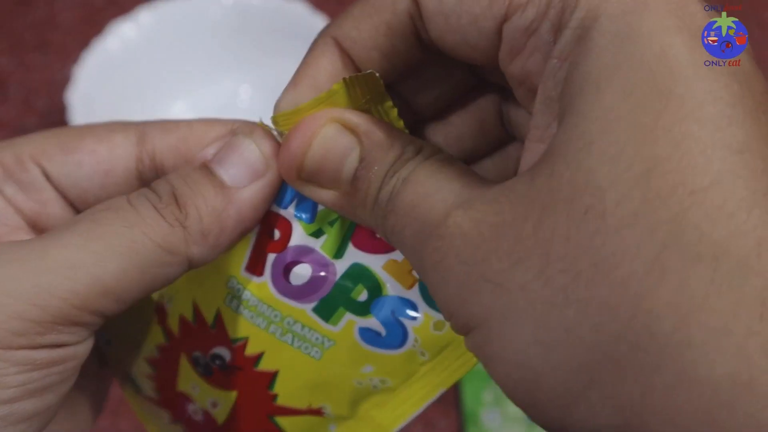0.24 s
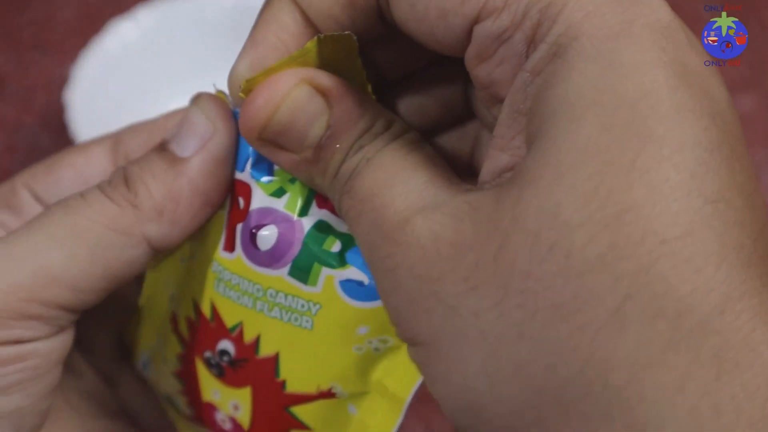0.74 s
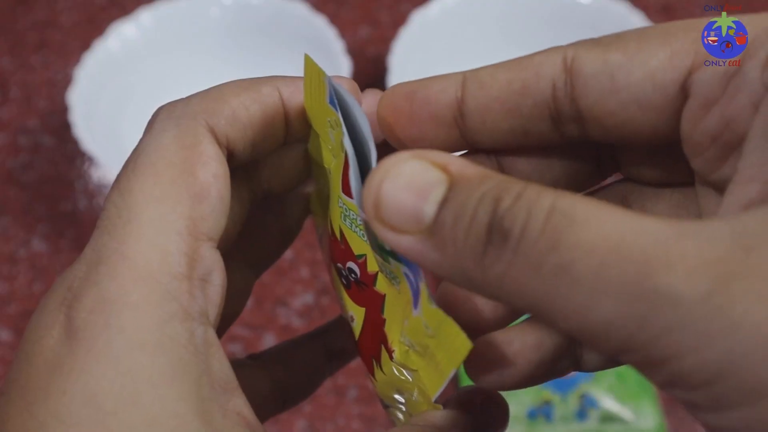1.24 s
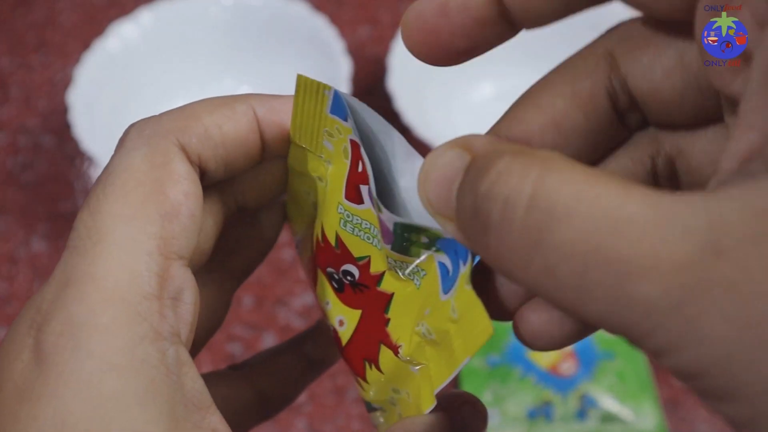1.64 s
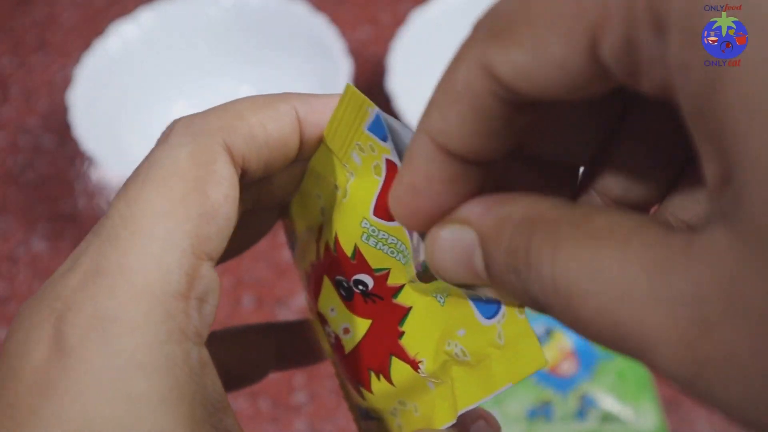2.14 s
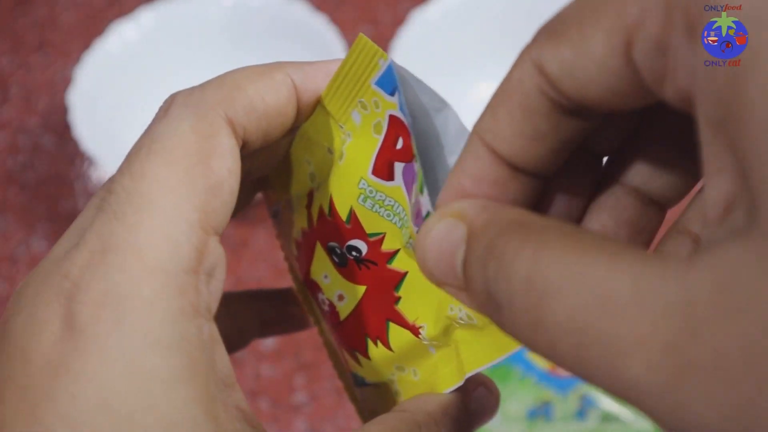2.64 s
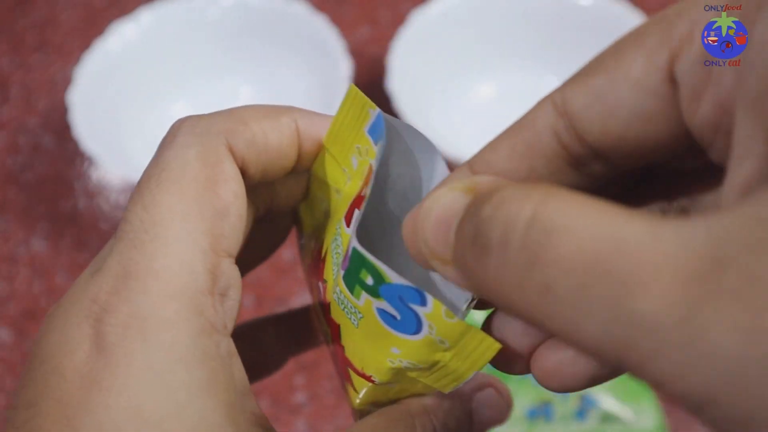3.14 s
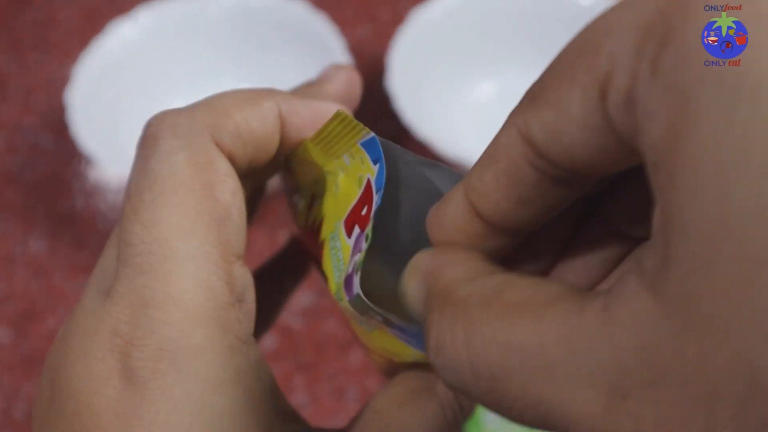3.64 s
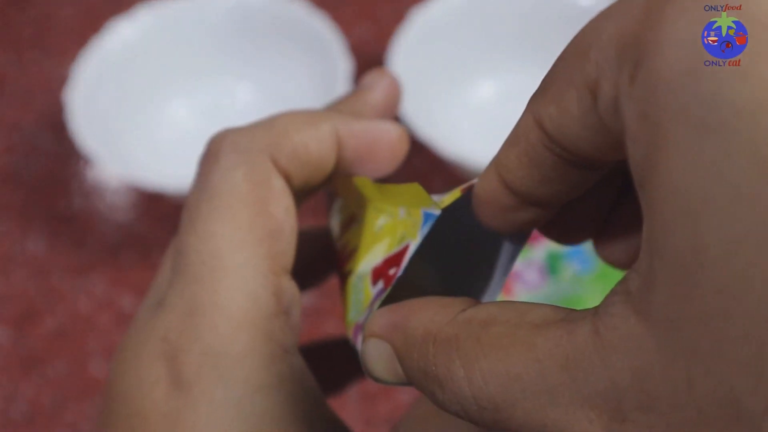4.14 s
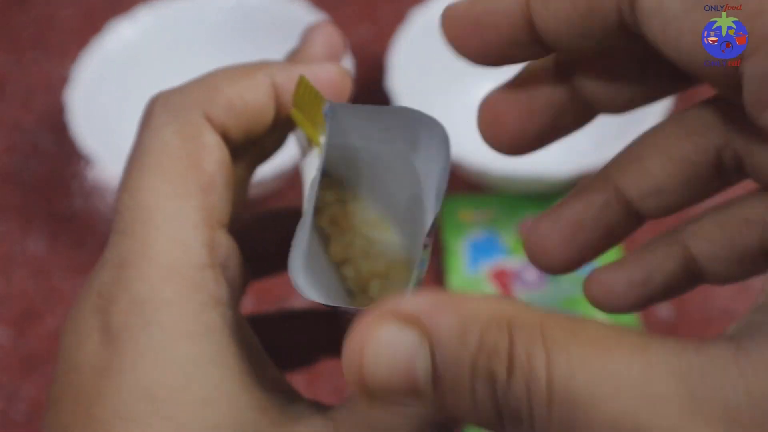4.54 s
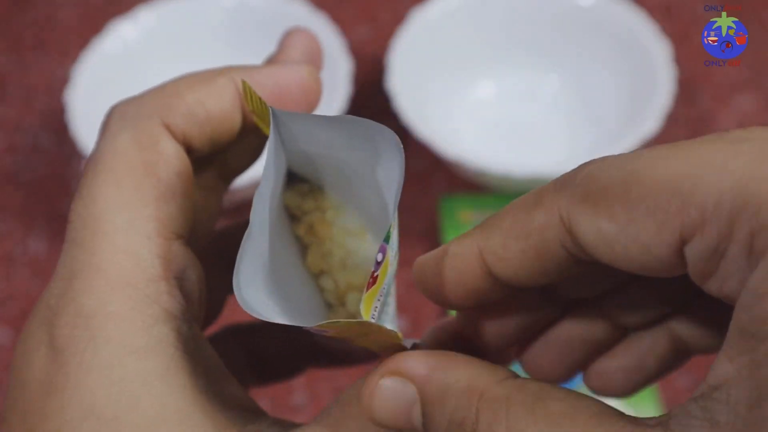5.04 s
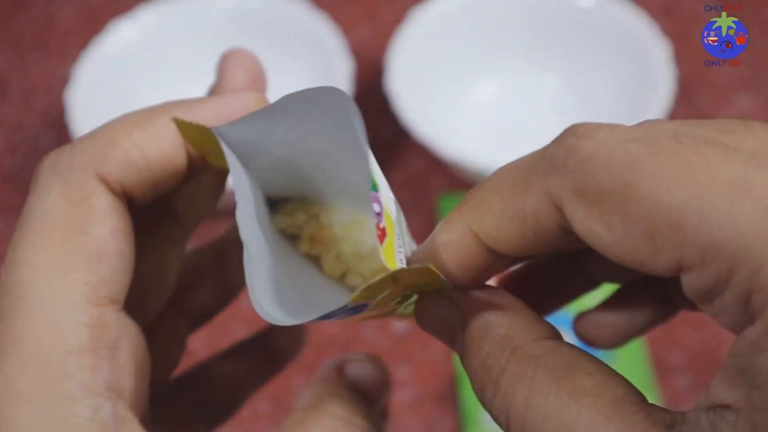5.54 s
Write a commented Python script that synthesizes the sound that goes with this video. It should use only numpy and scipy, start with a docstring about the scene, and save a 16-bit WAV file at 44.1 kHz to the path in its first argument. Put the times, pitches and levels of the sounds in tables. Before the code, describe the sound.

Thin, stiff plastic film crackles right beside the microphone, slightly left of centre. The seal tears abruptly at the start, then fingers make isolated clicks and short sliding rustles. Around three seconds the crackling turns loud and dense with a low thud, more snaps follow, and the last second and a half is nearly quiet with a few small crinkles. Short room echo, low background rumble, no speech.

```python
"""A hard-walled room: two hands tear and spread a small foil-lined sweet packet close to a stereo microphone.
Creases, the torn seal and sliding fingers are shaped runs of random cracks, coloured by sheet and pouch.
Rustle is dense tiny clicks in clumps; the room answers briefly with noise that dies away band by band.
Underneath lies a lumpy low rumble of filtered noise, which also gives the low thuds under loud snaps;
narrow resonances give a few wavering hums and the low ring of a thud."""
import sys
import numpy as np
from scipy import signal
from scipy.fft import rfft, irfft, next_fast_len
from scipy.io import wavfile
from scipy.ndimage import uniform_filter1d

SR = 44100
rng = np.random.default_rng(int(sys.argv[2]) if len(sys.argv) > 2 else 0)


def to_wav(sig):
    """Store sig (one row per channel, or 1-D mono) as 16-bit WAV at the path in sys.argv[1].

    Samples outside -1..1 are clipped; the rate is SR.
    """
    pcm = np.clip(np.atleast_2d(sig), -1, 1) * 32767
    pcm = np.round(pcm).astype(np.int16)
    wavfile.write(sys.argv[1], SR, pcm.T)  # frames by channels


N = 255780

# creases snapping through: (time [s], level [dB], ring of the panel [Hz], ring [dB],
# dull part [dB], hollow part [dB], bright part [dB], hold [s], fall by 60 dB [s])
SNAPS = [(0.041, 3.5, 2940, 14.5, -29.5, -19, -4.5, 0.0013, 0.014),
         (0.077, -10, 2760, 5.5, -39, -27.5, -16, 0.0017, 0.054),
         (0.148, -16.5, 3000, 3.5, -33.5, -21.5, -27, 0.0036, 0.019),
         (0.185, -25.5, 2970, -1, -48, -35, 0, 0.0014, 0.016),
         (0.248, -16, 588, 6.5, -11.5, -12, -21.5, 0.0019, 0.023),
         (0.265, -20.5, 2264, 0.5, -27.5, -26, -17, 0.0019, 0.075),
         (0.448, -25.5, 2675, 7, -36, -24, -38, 0.0012, 0.014),
         (0.478, -35.5, 506, 21, -17, -8, -32.5, 0.0011, 0.03),
         (0.556, -15.5, 2010, 10, -46, -18, -22, 0.0021, 0.02),
         (0.599, -13, 2270, 14, -44, -20.5, -29.5, 0.0012, 0.0083),
         (0.709, -9.5, 2210, 10.5, -34, -20, -18, 0.0014, 0.013),
         (0.913, -34, 3560, 10, -36, -17, -9, 0.0014, 0.038),
         (0.96, -16, 1040, 11, -21, -24.5, -13.5, 0.0019, 0.05),
         (0.966, -19, 1020, 4.5, -22, -5.5, -12, 0.0018, 0.043),
         (1.111, -35, 2650, 12.5, -21, -54, -13, 0.0012, 0.038),
         (1.386, -34.5, 1950, 2.5, -24.5, -20, -22, 0.0012, 0.047),
         (1.718, -24, 2750, 6, -20, -18.5, -23, 0.0012, 0.036),
         (1.781, -36, 715, 13.5, -18.5, -18, -14, 0.0012, 0.039),
         (1.901, -45.5, 4200, 22, -33, -35, -7.5, 0.0012, 0.075),
         (2.034, -17, 2060, 3, -26, -15, -13, 0.0013, 0.052),
         (2.207, -30, 1950, 12, -49, -49, -34, 0.0012, 0.027),
         (2.243, -40, 1890, 13, -26, -24, -20, 0.00092, 0.019),
         (2.406, -15, 1950, 2, -31.5, -16, -15.5, 0.0016, 0.025),
         (2.557, -13, 3160, 9, -30.5, -6.5, -8.5, 0.00088, 0.027),
         (2.578, -25, 2650, 16, -31, -16.5, -18, 0.0012, 0.025),
         (2.664, -31, 1830, 5, -35, -25, -14.5, 0.0026, 0.025),
         (2.734, -41, 1970, 10, -26.5, -25.5, 8.5, 0.0012, 0.025),
         (2.769, -12, 4250, 11.5, -29, -23.5, -0.5, 0.0014, 0.03),
         (2.806, 0.5, 3520, 11, -17.5, -16, -8.5, 0.0015, 0.03),
         (2.822, -10.5, 2310, 6, -40.5, -21, -22.5, 0.0014, 0.041),
         (2.845, -12.5, 1195, 10.5, -11.5, -14, -33, 0.0018, 0.0093),
         (2.849, 0, 2090, 4.5, -25.5, -23.5, -22, 0.0004, 0.046),
         (2.979, -8, 1950, 16.5, -31, -28, -9, 0.00056, 0.043),
         (3.177, -40.5, 2520, 4, -26, -16, -19.5, 0.0018, 0.026),
         (3.201, -36.5, 2444, 16, -30, -6, -52.5, 0.0026, 0.025),
         (3.337, -33, 1820, 8.5, -31, -17, -13.5, 0.002, 0.025),
         (3.425, -33.5, 1225, 12, -13, -14.5, -29, 0.00098, 0.025),
         (3.522, -0.5, 2060, 5, -29.5, -25.5, -17.5, 0.0024, 0.021),
         (3.526, -4, 2080, 0.5, -3, -12.5, -18, 0.00086, 0.0097),
         (3.591, -2, 894, 11, -19.5, -27.5, -17.5, 0.00057, 0.021),
         (3.751, -21.5, 2040, 13, -28, -9, -28, 0.0009, 0.017),
         (3.804, -15.5, 1170, 4.5, -15, -4.5, -41, 0.0019, 0.014),
         (3.867, -20, 1900, 14, -34, -17, -22, 0.0011, 0.032),
         (3.951, -40, 2450, 12, -20, -15, -6, 0.0013, 0.075),
         (4.029, -19, 3600, 3, -22, -26.5, -23, 0.00084, 0.068),
         (4.15, -16.5, 1150, 1, -33, -1.5, -24, 0.0034, 0.023),
         (4.286, -31, 4150, 7, -38, -22, -15, 0.0012, 0.029),
         (4.459, -22.5, 1266, 24.5, -19, -39, -14.5, 0.0012, 0.054),
         (4.482, -27, 2570, 5, -16.5, -30, -16, 0.0011, 0.042),
         (4.54, -30, 2430, 5, -23, -35, -11, 0.0012, 0.025),
         (4.556, -28, 3940, 7, -33, -32, -10, 0.0012, 0.021),
         (4.606, -26, 1950, 13.5, -53, -26, -12.5, 0.00083, 0.059),
         (4.688, -37, 2445, 5.5, -38, -35.5, -14, 0.0012, 0.037),
         (5.071, -26, 512, 19.5, 0, -29, -13, 0.0011, 0.033),
         (5.392, -24.5, 458, 10, -13, -18, -15.5, 0.00086, 0.073),
         (5.763, -25, 1850, 27, -38, -55, -13.5, 0.002, 0.0223)]
# the seal tearing open, a rip that stops short: columns as for the snaps
TEAR = [(0.047, -18, 3137, 3, -37, -19.5, -13, 0.06, 0.017)]
# fingers sliding over the film in short strokes: columns as for the snaps
STROKES = [(0.696, -23, 2290, 5, -24, -26, -18.5, 0.023, 0.045),
           (1.29, -42, 3900, 5, -41, -25, -17, 0.034, 0.13),
           (1.661, -43, 560, 6.2, -18, -26, -8.5, 0.029, 0.11),
           (2.334, -23.5, 900, 6.4, -14.5, -8.5, -10.5, 0.021, 0.18),
           (2.378, -24.5, 3060, 8.6, -24, -16, -12.5, 0.037, 0.065),
           (2.551, -25, 1260, 4, -36, -23, -17, 0.033, 0.12),
           (3.724, -16, 2540, 3.6, -18, -16, -16, 0.0086, 0.057),
           (4.402, -29, 2510, 9.2, -43, -21.5, -14, 0.042, 0.08),
           (4.435, -27, 1230, 10, -26, -17, -13, 0.04, 0.19),
           (4.921, -65, 459, 4.9, -2, -27, -11, 0.021, 0.072),
           (5.073, -28.5, 493, 7.6, -6, -16.5, -13, 0.023, 0.1),
           (5.327, -53.5, 463, 5, -22, -31, 9, 0.035, 0.08),
           (5.573, -29.5, 1890, 5, -24.5, -20, -7.5, 0.046, 0.16)]
# colour of a crack in the sheet: (frequency [Hz], usual level [dB],
# share of the dull part, of the hollow part, of the bright part, of the level [dB per dB])
SHEET = [(144, -32, .4, 0.0, 0.14, .2), (314, -18.5, 0.15, 0.059, 0.16, .25),
         (480, -12.5, 1.4, 0.0, 0.34, 0.23), (720, -7.5, 0.76, .15, 0.13, 0.13),
         (1026, -2.5, .1, .9, 0.15, 0.17), (1450, -3, 0.0, .8, 0.033, 0.16),
         (1950, -2.5, 0.26, 0.21, 0.22, 0.064), (2940, -.5, 0.0, 0.0077, 0.22, 0.21),
         (5070, 0.5, 0.0, 0.18, 0.82, 0.16), (7210, -7, 0.18, 0.17, 1.3, 0.0),
         (10530, -7, 0.1, 0.0, 2.1, 0.0), (15230, -37, 0.99, 0.17, 1.5, .45),
         (17060, -44, 0.081, 0.0, 0.65, .45)]
# usual dull part, hollow part, bright part and level of a crack: [dB] each
USUAL_PARTS = [-27, -19, -16, -20]
# resonances of the pouch, the bowls nearby and the microphone: (frequency [Hz], width [Hz], lift [dB])
POUCH = [(303, 25, 9.5), (449, 12, 7), (468, 55, 1.5), (856, 280, 5.5), (1140, 62, 2.5), (1772, 24, 8.5),
         (1929, 22, 10.5), (2122, 130, 6.5), (2404, 120, 5), (2600, 78, 5), (3130, 56, -1.5),
         (3650, 67, 3.5), (4220, 190, 4), (7670, 790, 2.5), (9460, 2100, 0.5)]
# fingers on the film: (time [s], dull rub [dB], body rustle [dB], bright fizz [dB])
RUSTLE = [(0.0, -44.5, -30.5, -30), (0.1, -74, -53.5, -54.5), (0.34, -59.5, -59.5, -62.5),
          (0.6, -58.5, -58, -62), (0.74, -53.5, -50, -54), (0.92, -75, -55, -50.5),
          (1.11, -68, -64.5, -70.5), (1.29, -79.5, -69, -78), (1.48, -73, -83, -112),
          (1.71, -101, -84, -63), (1.84, -74.5, -73, -62.5), (2.36, -69, -59.5, -63),
          (2.5, -72, -50.5, -51.5), (2.71, -66, -56.5, -55.5), (2.94, -61, -43.5, -39.5),
          (3.29, -74.5, -58, -62), (3.46, -65, -71, -72), (3.57, -62.5, -37, -64), (3.68, -54, -42, -60),
          (3.73, -57, -47, -47), (4.26, -66, -58.5, -64.5), (4.46, -69, -59.5, -59), (4.59, -69, -53, -52),
          (4.75, -72.5, -69.5, -68), (4.86, -82.5, -98, -95.5), (5.07, -90, -83, -78),
          (5.25, -87.5, -90, -89), (5.43, -71, -74.5, -54), (5.57, -80, -71, -73), (5.8, -75, -63, -57)]
# bands of the rub, the rustle and the fizz: (low edge [Hz], high edge [Hz])
RUSTLE_BANDS = [(400, 1400), (1400, 5000), (5000, 14000)]
# decay of the room: (frequency [Hz], fall by 60 dB [s])
ROOM_DECAY = [(300, 0.36), (1000, 0.35), (3000, 0.31), (8000, 0.29), (14000, 0.24)]
# level of the deep rumble: (time [s], level [dB])
DEEP_LEVEL = [(0.0, -52), (0.05, -70.5), (0.13, -57), (0.6, -60), (0.68, -43), (0.76, -58.5), (0.93, -53),
              (1.06, -67), (1.24, -54), (1.28, -64.5), (1.45, -51.5), (2.0, -52), (2.16, -67), (2.23, -43),
              (2.49, -59), (2.63, -53.5), (2.7, -70), (2.86, -56), (2.92, -72.5), (3.0, -56), (3.09, -78),
              (3.28, -50), (3.44, -78.5), (3.47, -48), (3.65, -60.5), (3.94, -41), (4.04, -60),
              (4.15, -44.5), (4.41, -51), (4.49, -63), (4.68, -45), (4.75, -63), (5.09, -55), (5.1, -50),
              (5.74, -63.5), (5.8, -74.5)]
# humps in the deep rumble: (frequency [Hz], width [Hz], lift [dB])
DEEP_HUMPS = [(88.1, 13, 8), (117.6, 2.4, 8.5)]
# level of the upper rumble and of the low thuds under loud snaps: (time [s], level [dB])
UPPER_LEVEL = [(0.0, -62), (0.06, -48), (0.13, -68.5), (0.53, -56.5), (1.05, -55.5), (1.28, -81.5),
               (1.97, -70), (2.03, -54.5), (2.18, -76), (2.44, -59.5), (2.68, -83.5), (2.86, -37.5),
               (2.99, -66), (3.49, -69), (3.52, -51), (4.04, -62.5), (4.07, -62), (5.02, -80), (5.07, -72),
               (5.8, -59)]
# wavering hums, and at 327 Hz the low ring of a thud: (time [s], length [s], frequency [Hz], level [dB])
LOW_TONES = [(0.123, 0.33, 170, -55), (0.423, 0.2, 290, -61), (0.624, 0.27, 170, -62),
             (1.978, 0.13, 170, -54.5), (2.216, .36, 170, -54.5), (2.6, 0.4, 447, -71),
             (2.803, 0.11, 170, -54), (2.825, 0.13, 447, -55), (2.833, 0.126, 327, -50),
             (3.107, 0.24, 170, -55.5), (3.7, 0.2, 290, -46), (3.933, 0.115, 290, -42.5),
             (3.937, 0.079, 447, -68.5), (4.219, 0.29, 170, -57.5), (5.131, .06, 170, -54),
             (5.553, 0.33, 290, -67)]
# width of the stereo picture, as gain of the side signal: (frequency [Hz],
# near cracks [dB], their echoes [dB], soft sounds [dB])
WIDTH = [(60, -17, -9, -21), (147.2, -8, -3.5, -10), (400, -11.5, -9.5, -2), (1000, -11.5, -1, 3.5),
         (2000, -8.5, 0.5, -1), (3200, -9, 2, -2.5), (5900, -6, -3.5, -3.5), (6700, -6.5, -7, -14.5),
         (9050, -12.5, -7, -15), (14000, -5.5, -11.5, -13)]

SNAP_GAIN_DB, STROKE_GAIN_DB, ROOM_GAIN_DB = -10, -16, -6.5
SNAP_RISE_S, STROKE_RISE_S = 0.001, 0.0024
NEARNESS = 0.16   # share of a crack's level that comes from being near the microphone, so is not in its echo
CRINKLES_PER_S, CRINKLE_S, CRINKLE_LIFT = 40, 0.012, 0.8
TONE_HZ, TONE_WIDTH_HZ, TONE_EDGE_S = [170, 290, 327, 447], 12, 0.06
LOWEST_DB, LOWEST_FOLLOWS = -66.5, 0.4   # lowest rumble: level, and share of the deep rumble's swing
LEFT_LEAD_S, LEAD_TOP_HZ = 0.00006, 6160   # the packet is nearer the left; the lead fades above this pitch
SOFT_TOP_HZ, CUTOFF_HZ = 11500, 16200


def snaps():
    """Snap-through buckling: a crease flips abruptly, with one large crack standing out of a dense run."""
    return bursts(SNAPS, SNAP_RISE_S, per_s=10000, spread_db=3.5, gain_db=SNAP_GAIN_DB, first=4.4)


def tear_and_strokes():
    """Tearing and sliding friction: many small releases follow so densely that no single crack stands out."""
    return bursts(TEAR + STROKES, STROKE_RISE_S, per_s=17000, spread_db=1.5, gain_db=STROKE_GAIN_DB, first=0)


def bursts(table, rise, per_s, spread_db, gain_db, first):
    """Source and filter: runs of cracks swell, die and excite the sheet; gives middle, side and room feed."""
    start, level_db, ring_hz, ring_db, *parts_db, hold, fall = np.array(table).T[..., None]
    t = np.arange(8192) / SR
    swell = np.minimum((t + 1e-4) / rise, 1) ** 2.2
    decay = from_db(-60 * np.maximum(t - rise - hold, 0) / np.maximum(fall, 1e-3))
    shape = swell * decay

    cracks = clicks((len(table), 2, len(t)), per_s, spread_db)
    cracks[..., int(rise * SR)] += first      # the crack that lets the crease go
    cracks = rfft(cracks * shape[:, None])
    even = -0.5 * np.log(uniform_filter1d(np.abs(cracks) ** 2, size=61))      # no broad chance colour of its own

    hz = np.arange(len(t) // 2 + 1) * SR / len(t)
    colour_db = sheet_colour(hz, [*parts_db, level_db])
    # the panel beside the crease rings at its own pitch
    colour_db += ring_db / (1 + ((hz / ring_hz - 1) / 0.081) ** 2)
    response = causal(even + np.log(from_db(colour_db))[:, None])
    sounds = lift(irfft(cracks * response), POUCH)

    strength = np.sqrt(np.sum(sounds ** 2, axis=2) / np.sum(shape ** 2, axis=1)[:, None])
    sounds = sounds * (from_db(level_db + gain_db) / strength)[..., None]
    far_gain = from_db(-NEARNESS * (level_db - USUAL_PARTS[-1]))
    far = sounds[:, :1] * far_gain[..., None]

    out = np.zeros((3, N + len(t)))
    for s, sound in zip(start[:, 0], np.concatenate([sounds, far], axis=1)):
        first_sample = round(s * SR)
        out[:, first_sample:first_sample + len(t)] += sound
    return out[:, :N]


def sheet_colour(hz, parts_db):
    """Superposition of spectral parts: each part's departure from usual tilts the sheet's usual spectrum."""
    usual_db, *shares = (at_hz(np.array(SHEET)[:, [0, k]], hz) for k in range(1, 6))
    return usual_db + sum(share * (db - usual) for share, db, usual in zip(shares, parts_db, USUAL_PARTS))


def rustle():
    """Crackling noise: dense tiny clicks in clumps; each narrow band's level drifts at random."""
    clumps_db = 1.2 * drift(22)
    grains = lift(clicks((2, 2, N), per_s=5000, spread_db=1.0), POUCH)
    out, turn = 0, 0
    for level_db, (low, high) in zip(in_time(RUSTLE), RUSTLE_BANDS):
        edges = np.geomspace(low, high, num=6)
        starts = np.abs(clicks(N, CRINKLES_PER_S, spread_db=3.0))
        crinkles = signal.lfilter([CRINKLE_LIFT], [1, -np.exp(-1 / (CRINKLE_S * SR))], starts)
        crinkle_gain = rms_one(1 + crinkles)
        for band_low, band_high in zip(edges, edges[1:]):
            share = rms_one(band(grains[turn], band_low, band_high)) / np.sqrt(5)      # five equal shares
            turn = 1 - turn      # neighbouring bands use separate noise, so their overlaps do not cancel
            gain = from_db(level_db + clumps_db + 2.5 * drift(21))
            out = out + gain * share * crinkle_gain
    return out


def room(x):
    """Diffuse reverberation: two unlike patterns of noise decay exponentially, octave by octave."""
    t = np.arange(SR // 2) / SR
    edges = 250 * 2 ** np.arange(0, 6.1, 1)
    white = rng.standard_normal((2, len(t)))
    echoes = 0
    for low, high in zip(edges, edges[1:]):
        fall_s = at_hz(ROOM_DECAY, np.sqrt(low * high))
        echoes = echoes + band(white, low, high) * from_db(-60 * t / fall_s)
    echoes = echoes * np.clip(t / 0.011, 0, 1)      # reflections build up
    return signal.fftconvolve(x[None], rms_one(echoes) / np.sqrt(len(t)), axes=1)[:, :N]


def rumble():
    """Band-limited noise under slow random modulation: three low bands, the upper with thuds, and low tones."""
    white = rng.standard_normal((2, N))
    deep_db = in_time(DEEP_LEVEL)[0] + 4.4 * drift(13)
    upper_db = in_time(UPPER_LEVEL)[0] + 4.6 * drift(11)
    lowest_db = LOWEST_DB + LOWEST_FOLLOWS * (deep_db - deep_db.mean()) + 2.5 * drift(3.9)
    out = from_db(deep_db) * rms_one(lift(band(white, 48, 120, order=3), DEEP_HUMPS))
    out += from_db(upper_db) * rms_one(band(white, 190, 420, order=3))
    out += from_db(lowest_db) * rms_one(band(white, 25, 51))
    return out + low_tones(white)


def low_tones(white):
    """Resonance: sharp filters turn noise into wavering hums and, at 327 Hz, the low ring of a thud."""
    out = 0
    for k, hz in enumerate(TONE_HZ):
        nearest = [(s, length, db) for s, length, near, db in LOW_TONES
                   if np.argmin(np.abs(near - np.array(TONE_HZ))) == k]
        tone = rms_one(resonance(resonance(white, hz, TONE_WIDTH_HZ), hz, TONE_WIDTH_HZ))
        out = out + swells(nearest, TONE_EDGE_S) * from_db(1.2 * drift(26.07)) * tone
    return out


def stereo(mid, side, column):
    """Interaural delay and decorrelation: middle, earlier on the left, plus and minus a side weighted by pitch."""
    size = next_fast_len(N + 999)
    hz = np.arange(size // 2 + 1) * SR / size
    side = rfft(side, size) * from_db(at_hz(np.array(WIDTH)[:, [0, column]], hz))
    # half the lead is an advance on the left, half a delay on the right
    lead = np.exp(1j * np.pi * hz * LEFT_LEAD_S / (1 + (hz / LEAD_TOP_HZ) ** 20))
    mid = rfft(mid, size)
    return irfft([mid * lead + side, mid / lead - side], size)[:, :N]


def clicks(shape, per_s, spread_db):
    """Shot noise: clicks at random instants, of random sign, with a long-tailed spread of sizes."""
    sizes = from_db(spread_db * np.minimum(rng.exponential(1, shape), 5)) * rng.choice([-1, 1], shape)
    return sizes * (rng.random(shape) < per_s / SR) + 1e-18


def drift(rate):
    """Slow random fluctuation: noise through a double one-pole low-pass; spread 1."""
    r = np.exp(-2 * np.pi * rate / SR)
    return rms_one(signal.lfilter([1], [1, -2 * r, r * r], rng.standard_normal(N + SR))[SR:])


def resonance(x, hz, width):
    """Damped oscillator: a pole pair sets pitch and width, with gain 1 on top."""
    r = np.exp(-np.pi * width / SR)
    poles = [1, -2 * r * np.cos(2 * np.pi * hz / SR), r * r]
    return signal.lfilter([(1 - r * r) / 2, 0, (r * r - 1) / 2], poles, x)


def lift(x, modes):
    """Modal amplification: raises x at each resonance in turn."""
    for hz, width, lift_db in modes:
        x = x + (from_db(lift_db) - 1) * resonance(x, hz, width)
    return x


def causal(log_gain):
    """Minimum phase: folding the cepstrum of a log magnitude gives a response in which nothing sounds early."""
    cepstrum = irfft(log_gain)
    half = cepstrum.shape[-1] // 2
    cepstrum[..., 1:half] *= 2
    cepstrum[..., half + 1:] = 0
    return np.exp(rfft(cepstrum))


def swells(rows, edge):
    """Amplitude envelope: gain rises, holds for about the length of each row and falls again."""
    t, out = np.arange(N) / SR, np.zeros(N)
    for s, length, db in rows:
        inside = np.minimum(t - s, s + length - t)
        out += from_db(db) * np.clip(inside / edge + 0.5, 0, 1) ** 2
    return out


def band(x, low, high, order=2):
    """Band limitation: a Butterworth filter passes low to high."""
    return signal.sosfilt(signal.butter(order, [low, high], "band", fs=SR, output="sos"), x)


def from_db(db):
    """Logarithmic level: decibels to amplitude."""
    return 10 ** (np.asarray(db) / 20)


def rms_one(x):
    """Effective value: scales x to a root mean square of 1."""
    return x / np.sqrt(np.mean(x ** 2, axis=-1, keepdims=True) + 1e-20)


def in_time(rows):
    """Linear interpolation in time: one curve per level column."""
    s, *columns = np.transpose(rows)
    return [np.interp(np.arange(N) / SR, s, c) for c in columns]


def at_hz(points, hz):
    """Logarithmic pitch: interpolates between points on a log-frequency axis."""
    points = np.array(points)
    return np.interp(np.log(np.maximum(hz, 1)), np.log(points[:, 0]), points[:, 1])


def scene():
    """Superposition: near cracks, their echoes and the soft sounds add, each with its own stereo width."""
    snap, stroke = snaps(), tear_and_strokes()
    # echoes, rustle and rumble lack the highest treble
    top = signal.butter(12, SOFT_TOP_HZ, fs=SR, output="sos")
    echoes = signal.sosfilt(top, from_db(ROOM_GAIN_DB) * room(snap[2] + stroke[2]))
    soft = signal.sosfilt(top, rustle() + rumble()) + stroke[:2]
    return stereo(*snap[:2], column=1) + stereo(*echoes, column=2) + stereo(*soft, column=3)


def record(dry):
    """Saturation and band limitation: peaks are rounded and clipped, then the top is cut."""
    rounded = np.clip(np.tanh(dry / 1.6) * 1.6, -0.86, 0.86)
    return signal.sosfilt(signal.cheby2(12, 70, CUTOFF_HZ, fs=SR, output="sos"), rounded)


dry = scene()
out = record(dry)
to_wav(out)
```